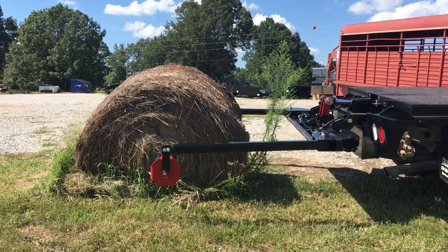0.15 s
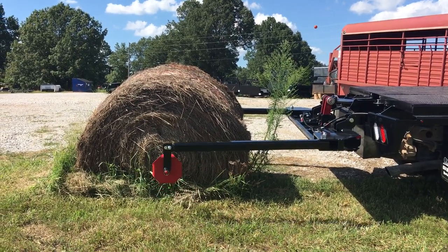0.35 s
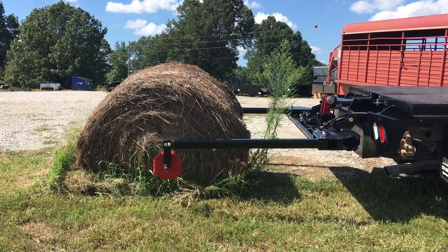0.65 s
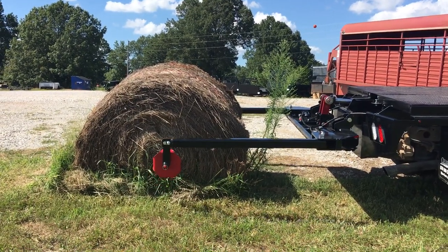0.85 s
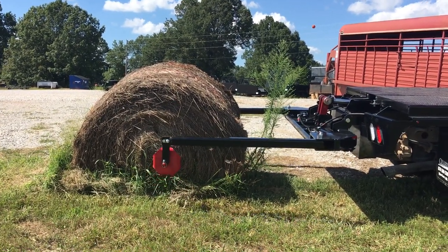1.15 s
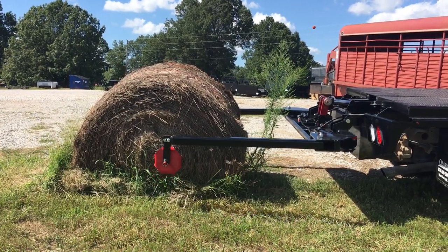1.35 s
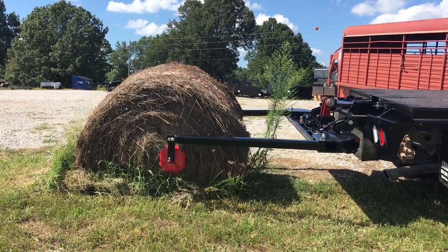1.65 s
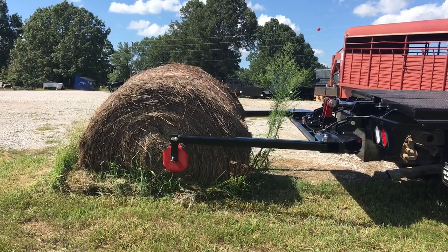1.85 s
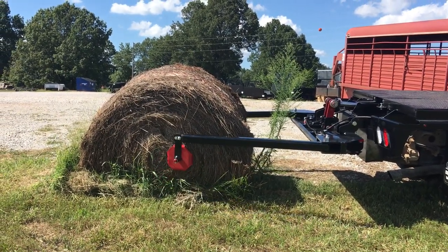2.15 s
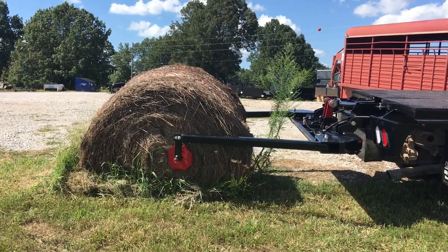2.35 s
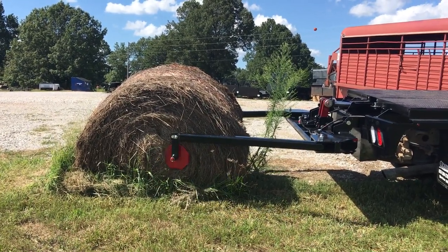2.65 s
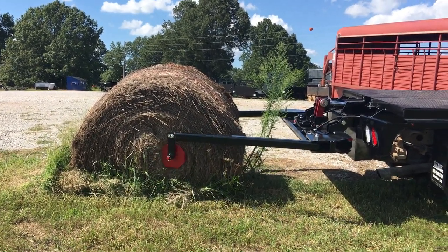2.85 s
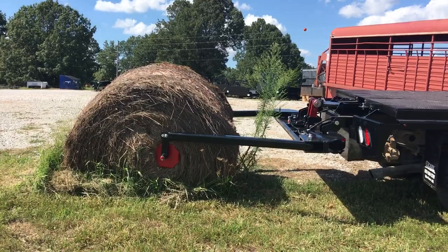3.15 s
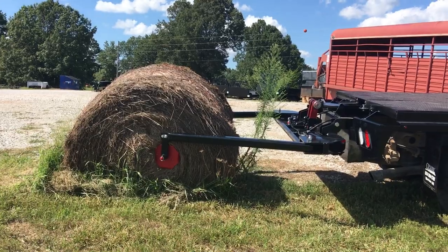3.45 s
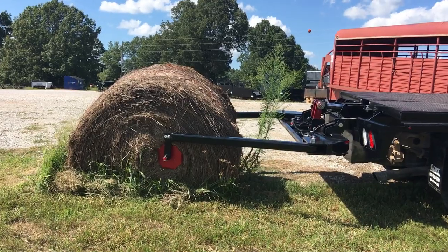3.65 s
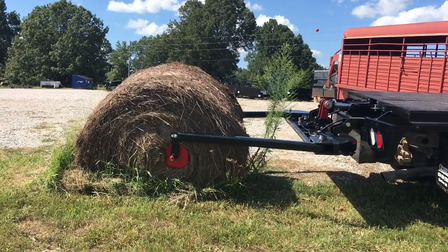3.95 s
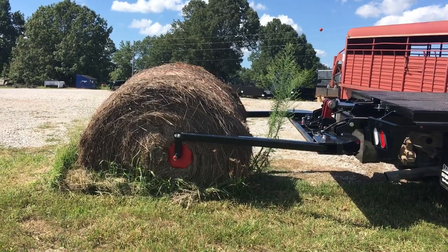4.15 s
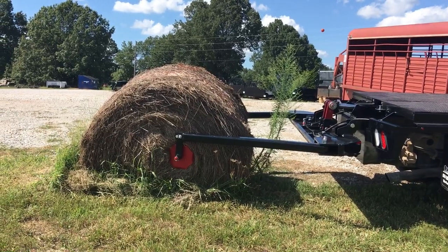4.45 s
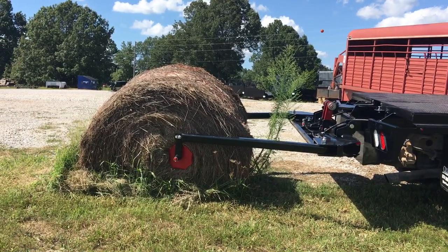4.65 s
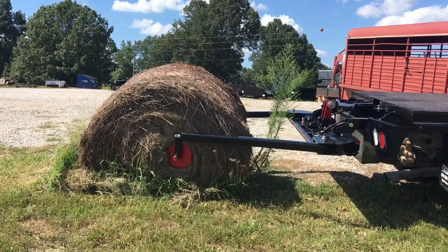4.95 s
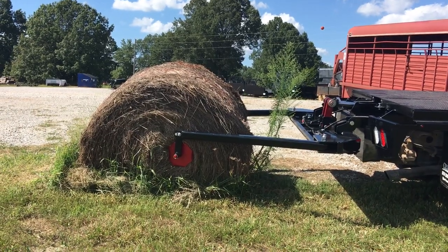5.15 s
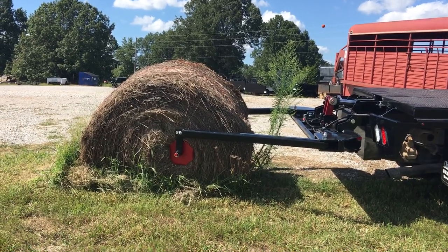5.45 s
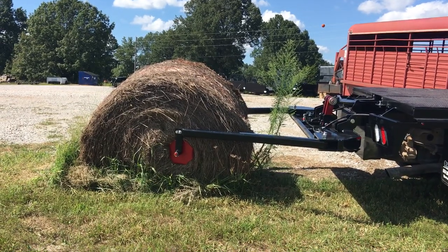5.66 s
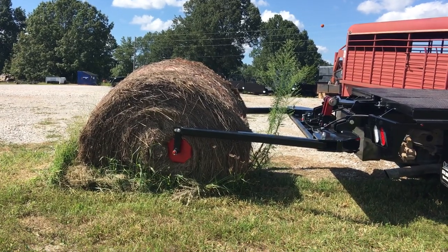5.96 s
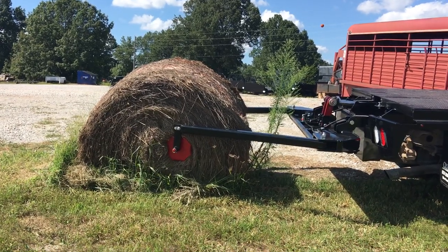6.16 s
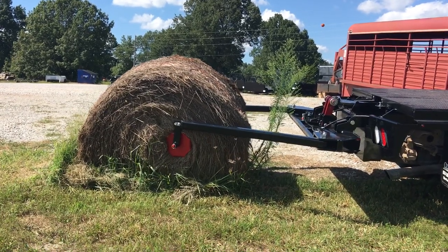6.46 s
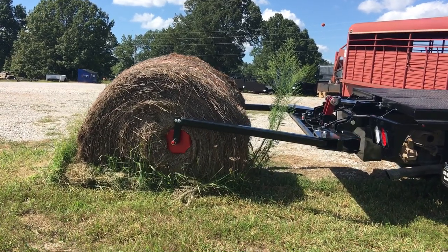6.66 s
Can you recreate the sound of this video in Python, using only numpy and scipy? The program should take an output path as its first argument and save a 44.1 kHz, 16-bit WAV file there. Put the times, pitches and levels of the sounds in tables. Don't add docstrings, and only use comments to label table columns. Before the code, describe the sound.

A hydraulic pump whines over a throbbing truck engine, steel arms clank and squeeze a hay bale, the pump bogs down, stops, then restarts under load.

```python
import sys
import numpy as np
from scipy import signal
from scipy.fft import rfft, irfft, next_fast_len
from scipy.io import wavfile

SR = 44100
rng = np.random.default_rng(int(sys.argv[2]) if len(sys.argv) > 2 else 0)


def transcribe(signal):
    frames = np.atleast_2d(signal).T
    limited = np.clip(frames, -1, 1)
    pcm = np.round(limited * 32767).astype(np.int16)
    wavfile.write(sys.argv[1], SR, pcm)


def volts_from_decibels(level):
    exponent = np.asarray(level, float) / 20
    return 10 ** exponent


N = 300321

# (frequency [Hz], density [dB per Hz])
YARD_RUMBLE = [(15, -57), (25, -24), (54, -8), (73, -3.5), (91, -12.5), (145, -11.5), (195, -13.5),
               (286, -31), (339, -23), (523, -36), (870, -35), (1000, -44.5), (1300, -87), (2200, -120)]
# (frequency [Hz], density [dB per Hz])
FAN_AIR = [(700, -13), (1000, 1.5), (1700, 1), (2100, -3), (2700, -11.5), (3200, -7.5), (3900, -3),
           (5000, -12), (5900, -11.5), (6600, -11), (7500, -15), (10000, -23), (15700, -50)]
YARD_DB, FAN_DB = -34, -53.5
FLOOR_DB = -70.5
# (frequency [Hz], density [dB per Hz])
BED_SHAKE = [(60, -70), (170, -33), (215, 9), (270, 5), (330, 3), (420, -35), (900, -90)]
# (time [s], level [dB])
BED_LEVEL = [(0, -69), (1.8, -60), (2.0, -47), (2.7, -47.5), (3.1, -44), (3.6, -50), (4.4, -52), (4.8, -54),
             (6.3, -63), (6.81, -47)]
# (frequency [Hz], width [Hz], level [dB rms])
PANEL_HUMS = [(122, 3.3, -40), (334.2, 0.9, -53.5)]
# (delay [s], level [dB])
ECHO_PATHS = [(.0041, -10), (.0093, -3), (0.0173, -16), (0.0273, -5), (.039, -7)]

# (time [s], firing rate [firings per s])
IDLE_RATE = [(0, 42.3), (1.8, 41.9), (2.5, 46), (3.3, 39.8), (3.8, 46.6), (5.0, 36.5), (5.6, 43.5),
             (6.2, 41.2), (6.81, 38.4)]
CYLINDER_LEVELS = [1.5, -8.5, -1.5, 0, -3, -6.5, -3.5, -18]
# (frequency [Hz], width [Hz], level [dB])
EXHAUST_PIPES = [(56, 17, -5.5), (130.46, 2.7, -0.5), (134, 3.7, 2), (167.6, 5.9, 0.5), (185.4, 5.1, -5),
                 (243.3, 12.4, -7), (330, 9.4, -14)]
EXHAUST_DB = -35
# (time [s], lead [cycles], crest [dB], depth [dB])
BOOM_SWELLS = [(0, -0.0069, -28.5, 15), (.3, -0.039, -27.5, 7), (.78, -0.073, -27.5, 4),
               (1.2, -0.49, -27, 9.5), (1.55, -0.27, -27.5, 1.5), (1.9, -0.47, -25.5, 8),
               (2.5, -0.53, -25.5, 9.5), (2.85, -0.63, -27.5, 3), (3.25, -0.5, -26, 10.5),
               (3.6, -0.53, -24, 18), (4.0, -0.36, -22.5, 19.5), (4.5, -0.38, -29.5, 16.5),
               (4.85, -0.21, -25.5, 13.5), (5.3, -0.29, -24.5, 9.5), (5.7, -0.21, -27, 10),
               (6.3, -0.36, -31.5, 4.5), (6.81, -0.37, -34.5, -3.5)]
# (time [s], level [dB])
ODD_CYCLE_HITS = [
    (3.03, 7),
    (3.428, -1.5),
    (3.61, 3.5),
    (3.79, -4),
    (4.14, -2.5),
    (4.32, 0.5),
    (4.49, 9.5),
    (5.58, -6),
    (6.0, 6.5),
]
CYCLES_PER_S, ODD_CYCLE_S = 5.4, 0.046
THROB_FULLNESS = 0.69

# (time [s], peak [dB], centre frequency [Hz])
STRAW_SNAPS = [(2.3004, -40, 8000), (2.337, -44, 8800), (2.351, -44, 8700), (2.405, -44, 8900),
               (2.4525, -30, 9500), (2.6465, -39, 9200), (2.8685, -39, 7100), (2.4994, -42, 8400),
               (2.5584, -41, 8630), (2.5661, -30, 12000), (2.712, -27, 9600), (2.921, -35, 5720),
               (2.9492, -16.5, 8540), (2.9504, -28, 7000), (2.6304, -40, 9250), (2.9901, -35, 5430),
               (3.0764, -36, 7960), (3.0952, -35, 6640), (3.2324, -51, 6400), (3.328, -52, 11000),
               (3.4176, -54, 11000), (3.535, -39, 7400), (3.5351, -43, 12500), (3.7718, -49, 6500),
               (3.8845, -54, 9900), (3.91, -52, 12000), (4.0754, -57, 6700), (4.2776, -45, 7100),
               (5.0229, -51, 12500), (5.3417, -48, 9000), (5.5976, -47, 8000), (6.287, -50, 6000),
               (6.4544, -37, 11000), (6.5744, -37, 12000)]
# (time [s], level [dB rms], low edge [Hz], high edge [Hz], 60 dB decay [s])
VALVE_RATTLES = [(1.87, -29.5, 440, 6300, 0.11), (3.078, -38.5, 510, 2200, 0.22),
                 (3.084, -39, 6100, 11000, 0.082), (3.142, -45.5, 3100, 4000, 0.15),
                 (3.1397, -44.5, 3300, 10000, 0.094), (5.11, -61, 7900, 8400, .12),
                 (5.231, -54.5, 2200, 5600, 0.49), (5.23, -65, 7100, 7370, .5),
                 (5.235, -67, 8210, 8600, .5), (5.611, -40, 3000, 4700, 0.15),
                 (5.611, -37.5, 5300, 14000, 0.1), (5.622, -40, 930, 1640, 0.15),
                 (5.648, -33, 575, 820, 0.45), (5.652, -36, 520, 1020, 0.095), (2.3, -54, 4100, 6500, 3),
                 (2.6, -56, 4000, 6700, 3), (5.675, -40, 1760, 1900, 0.22), (2.97, -33, 1360, 1800, 0.072),
                 (6.645, -40, 5200, 6800, 0.058)]
# (time [s], level [dB], hardness [dB per octave])
ARM_BLOWS = [(1.809, -19.5, 1.5), (1.812, -21.5, 3), (1.817, -19.5, 0), (1.822, -22.5, 1.5),
             (1.827, -18.5, 0), (1.843, -20.5, -5), (1.86, -21.5, -5), (1.877, -21, -8), (1.925, -26, -5),
             (1.935, -26, -2.5), (1.948, -30, -2), (2.024, -28, -11)]
# (frequency [Hz], level [dB], 60 dB decay [s])
ARM_MODES = [(184, -1.5, 0.18), (278, -10, 0.21), (541, -5, 0.051), (618, 0, 0.12), (753, -3.5, 0.041),
             (1000, 0.5, 0.015), (1180, -4.5, 0.055), (1450, -7, 0.064), (1620, -0.5, 0.046),
             (1850, -11, 0.066), (2066, -8, 0.12), (2510, -3, 0.022), (3100, -15, 0.028),
             (3540, -10.5, 0.056), (4580, -10, 0.016), (5140, -19, .03), (7100, -26, .03)]

# (time [s], whine [dB], oil flow [dB])
CLAMP_EFFORT = [(0, -42.5, -49), (.6, -43, -48), (1.82, -43, -48.5), (1.88, -47, -38.5), (2.1, -52, -40),
                (2.35, -48, -39.5), (2.6, -44.5, -39), (2.82, -39.5, -45), (2.92, -44, -50),
                (3.0, -44, -53), (3.14, -50, -57)]
# (time [s], whine [dB], oil flow [dB])
LIFT_EFFORT = [
    (5.63, -44, -49),
    (5.74, -43.5, -36.5),
    (5.85, -44, -43),
    (6.0, -43, -39.5),
    (6.3, -42.5, -41.5),
    (6.45, -43, -41.5),
    (6.6, -42, -42.5),
    (6.81, -38, -43),
]
FREE_HZ, TEETH = 564, 9
COLD_DROP_HZ = 1.1
GRIP_S, GRIP_SPAN_S, GRIP_DROP_HZ = 1.9809, .1029, 26.4
PACK_S, PACK_SPAN_S, PACK_DROP_HZ = 2.74, .06, 5.3
STALL_S, STALL_SPAN_S, STALL_DROP_HZ = 2.6448, .2596, 338.2
START_S, SPIN_UP_S, START_TOP_HZ = 5.6084, .0652, 529.7
WEIGHT_S, WEIGHT_SPAN_S, WEIGHT_DROP_HZ = 6.0593, .4953, 182.2

# (harmonic [multiple], level [dB])
FREE_LINES = [(1, 2.5), (2, 0), (3, -5), (4, -1.5), (5, -24.5), (6, -7.5), (7, -8.5), (8, -14), (9, -19.5),
              (10, -25), (11, -30), (12, -13.5), (13, -13.5), (14, -4), (15, -10), (16, -15), (17, -20),
              (18, -23), (19, -32), (20, -30), (21, -33), (22, -26), (23, -27), (24, -24), (25, -34),
              (26, -39), (27, -36)]
# (harmonic [multiple], level [dB])
LOADED_LINES = [(1, 10), (2, -8), (3, -5.5), (4, -5.5), (5, -4.5), (6, 1.7), (7, -3.5), (8, -2), (9, 4),
                (10, 1.5), (12, 3), (14, -3), (17, -2.2), (20, 3), (28, -4), (40, -8.1)]
# (harmonic [shaft multiple], level [dB])
MOTOR_LINES = [(34, -12.5), (56, -16), (113, -18), (128, -19.5)]
# (frequency [Hz], width [Hz], level [dB])
HOUSING_MODES = [(350, 170, -6.5), (456.5, 13, -0.5), (650, 134, 8), (889, 104, 5.5), (1140, 167, 9.5),
                 (1410, 305, 5), (1630, 60, -2), (1870, 120, -7), (2060, 237, 5.5), (2223, 31, 2),
                 (2440, 330, -6), (3320, 113, -3.5), (3531, 19, 9), (3686, 194, 4), (4010, 190, -11.5),
                 (4560, 230, -8.5), (5186, 250, -7.5), (5426, 26, 1.5), (5880, 220, -6.5), (6700, 56, -8),
                 (7110, 120, 0.5), (7650, 100, -18), (8000, 320, -9.5), (8300, 52, -12), (8800, 630, -5.5),
                 (9500, 540, -23), (11000, 380, -27), (11500, 107, -15), (12171, 356, -20),
                 (12855, 221, -21), (13600, 271, -30)]
# (harmonic [multiple], level [dB])
UNSETTLED_LINES = [(1, 2), (2, -3), (3, -11), (4, -1), (6, 0.5), (7, -9), (8, 1.5)]
SETTLE_S, SETTLE_SPAN_S = .28, .03
# (harmonic [multiple], frequency [Hz],
# width [Hz], level [dB])
HOSE_FLARES = [(1, 336, 60, -15.5), (1, 358, 5.2, 12), (1, 375, 5.6, -17), (1, 462, 77, -5),
               (1, 530, 12.6, -18), (1, 543, 5.6, 8), (2, 806, 29, 9.5), (2, 853, 43, 6),
               (2, 680, 33, -6.5), (2, 1085, 8.4, 10), (3, 693, 130, 29), (3, 1073, 6.1, -13),
               (3, 1118, 7, -20), (4, 1330, 140, -11), (4, 1488, 16, -7), (4, 1584, 103, -18),
               (3, 1635, 57, 16), (3, 950, 200, 5), (5, 2750, 260, -9), (6, 2880, 170, -5.5),
               (7, 3280, 440, -4.5), (5, 2280, 40, -1), (1, 460, 59, -1.5), (2, 610, 140, -15),
               (9, 5000, 130, -12), (10, 5450, 130, -2.5), (8, 3300, 190, -3), (9, 4100, 150, -9),
               (21, 8200, 440, 5), (22, 8200, 500, 9), (11, 4400, 150, 13), (4, 1640, 460, 20),
               (4, 1753, 43, 6.5), (4, 1763, 150, -7), (4, 2010, 73, -4.5), (4, 2145, 7.8, -20),
               (4, 2238, 43, 9.5), (6, 1500, 232, 6), (6, 1962, 340, 16.5), (6, 2161, 20, -27),
               (6, 2270, 82, -1), (7, 3714, 21, 6), (7, 3810, 43, 15), (11, 4512, 150, 7),
               (13, 7099, 240, 5.5), (13, 7295, 23, 16), (14, 7624, 202, 14), (18, 8340, 300, 2),
               (19, 8700, 380, 4.5), (23, 12850, 150, 2), (16, 8900, 150, -3)]
# (harmonic [multiple], frequency [Hz], width [Hz], level [dB])
LIFT_HOSE_FLARES = [(3, 1240, 130, 2), (8, 3080, 140, 3), (11, 5100, 90, 8), (11, 4160, 120, 11),
                    (10, 4560, 80, -3), (12, 5400, 300, -1), (16, 7100, 300, -8), (18, 8300, 900, 3),
                    (20, 8300, 470, 8), (21, 8800, 300, -12), (22, 8300, 200, 0), (6, 2230, 130, -2.5),
                    (4, 1750, 180, 0.5), (14, 6300, 300, -3), (17, 7500, 300, 5), (2, 920, 60, 0.5),
                    (1, 426, 36, -5), (2, 890, 53, -5), (4, 1860, 56, 3.5), (9, 3700, 100, 0),
                    (12, 5560, 60, 0), (13, 5900, 300, 1), (5, 2300, 80, -6), (7, 2600, 200, -3),
                    (10, 4360, 300, 2), (6, 1980, 130, 7.5), (11, 4740, 200, -4)]
# (harmonic [multiple], start [s], level [dB])
SQUEEZED_LINES = [(1, 2.49, -12), (4, 2.76, -2.5), (3, 2.76, 1), (8, 2.6, 1), (8, 3.4, 1), (9, 2.85, 0),
                  (12, 2.75, 1), (11, 2.5, -2.5), (19, 2.4, -2), (20, 2.55, 0), (21, 2.55, -10),
                  (10, 2.35, 4), (12, 2.2, -4), (16, 1.9, -2), (14, 2.43, 2.5), (13, 2.25, -3),
                  (10, 1.9, -3), (11, 1.8, -6), (11, 2.3, 7), (4, 1.98, 2), (6, 2.2, -4), (6, 2.7, 4),
                  (6, 2.87, -3.5), (7, 2.8, -1), (10, 2.75, -6), (13, 2.45, 4), (15, 2.37, 3)]
BITE_S, UNBITTEN_DB = 5.75, -7
THIRD_FADE_S, THIRD_FADE_DB = 1.15, -5
HARMONICS, TOP_HZ = 40, 15700
FREE_BRIGHT_DB, LOADED_BRIGHT_DB = 1.07, 1.93
DULLING_DB, DULLEST_DB = 8.5, -3.5
WANDER_DB = 1.3
FLUTTER_DB, FLUTTER_PER_S = 2.6, 13
LOADED_JITTER, STALL_JITTER, JITTER_FROM_S = .022, .09, 2.68
SIDE_GROWTH_DB, SIDE_GROWTH_FROM = 9, 17
ROUGH_FROM_S, STALL_FLUTTER_DB = 2.95, 3.5

# (frequency [Hz], density [dB per Hz])
OIL_HISS = [(400, -30), (777, -39), (1160, 1.5), (1680, -7.5), (1960, -4.5), (2200, 3.5), (2750, -19.5),
            (3580, -2.5), (4800, -7.5), (6300, -11), (7100, -6.5), (8400, -2.5), (9400, -7.5), (10300, -33)]
LOADED_HISS_DB = -6
# (frequency [Hz], density [dB per Hz])
BRUSH_SIZZLE = [(8000, -11), (9800, -7.5), (10400, -8.5), (11600, -6), (12200, -11), (13000, -8),
                (13600, -13), (14500, -13), (15700, -13), (15900, -48)]
SIZZLE_DB, SIZZLE_LIFT_DB, SIZZLE_FOLLOWS = -58, -64.5, 0.6
# (frequency [Hz], density [dB per Hz])
FRAME_GROAN = [(350, -42), (480, -12), (590, 3.5), (680, -4), (780, -4), (944, 3.5), (1130, -4),
               (1400, -11), (1700, -12), (2200, -13), (2800, -33.5), (7000, -40)]
GROAN_DB = -58.5
# (time [s], level [dB], rise [s], fall [s])
FRAME_SHUDDERS = [
    (1.95, -48, 0.15, 0.13),
    (2.4, -60, 0.27, 0.17),
    (2.98, -44, 0.2, 0.062),
    (3.09, -44.5, 0.081, 0.11),
    (5.66, -44, 0.012, 0.11),
    (6.5, -55.5, 0.071, 0.36),
]
GRIND_BAND = [614, 1100]
GRIND_S, GRIND_DB, GRIND_RISE_S, GRIND_FALL_S = 3.08, -48, 0.17, 0.065


def rms_one(x):
    return x / np.sqrt(np.mean(x ** 2) + 1e-20)


def in_time(rows):
    s, *columns = np.transpose(rows)
    return [np.interp(np.arange(N) / SR, s, c) for c in columns]


def smooth_step(t, at, span):
    return .5 + .5 * np.tanh((t - at) / span)


def swell(t, at, rise, fall):
    return np.exp(-((t - at) / np.where(t < at, rise, fall)) ** 2)


def drift(rate, count=1):
    knots = rng.standard_normal((count, int(N / SR * 60) + 62))
    r = np.exp(-2 * np.pi * rate / 60)
    slow = signal.lfilter([1], [1, -r], knots)[:, 60:]
    at = np.arange(N) / SR * 60
    return np.array([np.interp(at, np.arange(len(k)), rms_one(k)) for k in slow])


def shaped(x, gain):
    size = next_fast_len(N + SR // 2)
    hz = np.arange(size // 2 + 1) * SR / size + 1e-3
    return irfft(rfft(x, size) * gain(hz), size)[:N]


def coloured(points):
    hz, db = np.transpose(points)
    return rms_one(shaped(rng.standard_normal(N), lambda f: volts_from_decibels(np.interp(np.log(f), np.log(hz), db))))


def echoes(hz):
    return 1 + sum(volts_from_decibels(db) * np.exp(-2j * np.pi * hz * late) for late, db in ECHO_PATHS)


def yard():
    rumble = volts_from_decibels(YARD_DB + .5 * drift(24.0)[0]) * coloured(YARD_RUMBLE)
    return rumble + volts_from_decibels(FAN_DB + .5 * drift(5.9)[0]) * coloured(FAN_AIR)


def bed_panels():
    return volts_from_decibels(in_time(BED_LEVEL)[0] + 4.2 * drift(10.0)[0]) * coloured(BED_SHAKE)


def panel_hums():
    t, out = np.arange(N) / SR, np.zeros(N)
    for hz, width, db in PANEL_HUMS:
        level = volts_from_decibels(db) * np.sqrt(2) * volts_from_decibels(0.83 * drift(width)[0])
        out += level * np.sin(2 * np.pi * hz * t + 1.05 * drift(width)[0])
    return out


def exhaust_response(hz):
    gain = volts_from_decibels(-46.0)
    for k, (centre, width, db) in enumerate(EXHAUST_PIPES):
        off_tune = (hz / centre - centre / hz) * centre / width
        gain = gain + volts_from_decibels(db) / (1 + 1j * off_tune) * 1j ** (k % 2)
    return gain / (1 + (hz / 450) ** 4)


def throb_db():
    t, (lead, crest_db, depth_db) = np.arange(N) / SR, in_time(BOOM_SWELLS)
    dip = np.sin(np.pi * (CYCLES_PER_S * t + lead)) ** 2
    odd_db = sum(db * swell(t, s, ODD_CYCLE_S, ODD_CYCLE_S) for s, db in ODD_CYCLE_HITS)
    return crest_db - depth_db * dip ** THROB_FULLNESS + odd_db + 1.7 * drift(3.9)[0]


def engine():
    fired = np.cumsum(in_time(IDLE_RATE)[0]) / SR
    at = np.flatnonzero(np.diff(np.floor(fired)))
    pulses = np.zeros(N)
    pulses[at] = volts_from_decibels(np.resize(CYLINDER_LEVELS, len(at)) + 3.7 * rng.standard_normal(len(at)))
    pipes = rms_one(shaped(pulses, exhaust_response))
    boom = np.sqrt(2) * np.sin(4 * np.pi * fired + 0.84 * drift(1.17)[0])
    return volts_from_decibels(EXHAUST_DB - 6.0) * pipes + volts_from_decibels(throb_db()) * boom


def straw():
    out, t = np.zeros(N), np.arange(300) / SR
    for s, db, hz in STRAW_SNAPS:
        snap = np.sin(2 * np.pi * hz * t) * np.exp(-t * hz / 0.52)
        crackle = 0.07 * rng.standard_normal(len(t)) * np.exp(-t / 0.0007)
        out[round(s * SR):][:len(t)] += volts_from_decibels(db + 13.0) * (snap + crackle)
    return signal.sosfilt(signal.butter(2, 4300.0, "high", fs=SR, output="sos"), out)


def rattles():
    out, t = np.zeros(N), np.arange(SR // 3) / SR
    for s, db, low_hz, high_hz, t60 in VALVE_RATTLES:
        band = signal.butter(3, [low_hz, high_hz], "band", fs=SR, output="sos")
        contacts = rms_one(signal.sosfilt(band, rng.standard_normal(len(t))))
        burst = contacts * volts_from_decibels(db - 60 * t / t60) * np.minimum(t / 0.0014, 1)
        start = round(s * SR)
        out[start:][:len(t)] += burst[:N - start]
    return out


def clank():
    (s, db, hardness_db), out = np.transpose(ARM_BLOWS), np.zeros(N)
    for hz, level_db, t60 in ARM_MODES:
        luck = rng.standard_normal(len(s))
        blow_db = db + level_db - 7.0 + hardness_db * np.log2(max(hz / 600, 1)) + 2.5 * luck
        blows = np.full(N, 1e-18)
        blows[(s * SR).astype(int)] = volts_from_decibels(blow_db) * np.sign(luck)
        r, w = volts_from_decibels(-60 / (t60 * SR)), 2 * np.pi * hz / SR
        out += signal.lfilter([0, np.sin(w)], [1, -2 * r * np.cos(w), r * r], blows)
    return signal.sosfilt(signal.butter(4, 6500, fs=SR, output="sos"), out)


def housing(hz):
    peaks = sum(volts_from_decibels(db) / (1 + ((hz / centre - centre / hz) * centre / width) ** 2)
                for centre, width, db in HOUSING_MODES)
    return volts_from_decibels(-58.0) + peaks


def pump_speed(t):
    clamp = FREE_HZ + .2 - COLD_DROP_HZ * (1 - smooth_step(t, SETTLE_S, 3 * SETTLE_SPAN_S))
    clamp = clamp - GRIP_DROP_HZ * smooth_step(t, GRIP_S, GRIP_SPAN_S)
    clamp = clamp - PACK_DROP_HZ * smooth_step(t, PACK_S, PACK_SPAN_S)
    clamp = clamp - STALL_DROP_HZ * np.exp(-np.exp((STALL_S - t) / STALL_SPAN_S))
    lift = START_TOP_HZ * (1 - np.exp(np.minimum(START_S - t, 0) / SPIN_UP_S))
    lift = lift - WEIGHT_DROP_HZ * smooth_step(t, WEIGHT_S, WEIGHT_SPAN_S)
    return np.where(t < START_S, clamp, np.maximum(lift, 100))


def line_gain(k, t, mesh_hz, load, loaded_db):
    lifting = t > START_S
    free_db = np.interp(k, *np.transpose(FREE_LINES), right=-60)
    free_db = free_db - 20 * np.log10(abs(housing(k * FREE_HZ)))
    db = (1 - load) * (free_db - loaded_db)
    unsettled_db = np.interp(k, *np.transpose(UNSETTLED_LINES), right=0)
    db = db + unsettled_db * (1 - smooth_step(t, SETTLE_S, SETTLE_SPAN_S))
    for flares, present in ((HOSE_FLARES, load), (LIFT_HOSE_FLARES, lifting)):
        for multiple, centre_hz, width, flare_db in flares:
            if multiple == k:
                db = db + present * flare_db / (1 + (2 * (k * mesh_hz - centre_hz) / width) ** 2)
    for multiple, s, squeeze_db in SQUEEZED_LINES:
        if multiple == k:
            db = db + squeeze_db * smooth_step(t, s, 0.05) * (t < START_S)
    if k > 4:
        db = db + UNBITTEN_DB * lifting * (1 - smooth_step(t, BITE_S, .03))
    if k == 3:
        db = db + (1.5 - load) * THIRD_FADE_DB * smooth_step(t, THIRD_FADE_S, 0.47)
    return volts_from_decibels(db)


def gear_tone(t, mesh_hz, load, shaft):
    slowed_db = LOADED_BRIGHT_DB + DULLING_DB * np.log2(mesh_hz / FREE_HZ)
    bright_db = (1 - load) * FREE_BRIGHT_DB + load * np.maximum(slowed_db, DULLEST_DB)
    turns = np.array([f(j * shaft) for j in (1, 2, 3, 4) for f in (np.sin, np.cos)])
    side_db = [-19.0, -22.5, -27.0, -41.0]
    uneven = rng.standard_normal((HARMONICS, 2, len(turns))) * volts_from_decibels(np.repeat(side_db, 2))
    wander = drift(2.5, count=HARMONICS)
    flutter = load * FLUTTER_DB * (drift(FLUTTER_PER_S, count=7) - .15)
    stalling = smooth_step(t, JITTER_FROM_S, .08) * (t < START_S)
    jitter = (LOADED_JITTER + STALL_JITTER * stalling) * flutter[-1]
    tone = np.zeros(N)
    for k, (loud, late), slow in zip(np.arange(HARMONICS) + 1, uneven, wander):
        loaded_db = np.interp(k, *np.transpose(LOADED_LINES))
        main = line_gain(k, t, mesh_hz, load, loaded_db)
        phase = k * (TEETH * shaft + jitter) + k * k
        side = min(k / 3, 1) * (1 - .25 * load)
        side = side * volts_from_decibels((1 - load) * SIDE_GROWTH_DB * (k >= SIDE_GROWTH_FROM))
        lines = (main + side * (loud @ turns)) * np.sin(phase) + side * (late @ turns) * np.cos(phase)
        level_db = loaded_db + bright_db * np.log2(k) + WANDER_DB * (0.57 + k / 14) * slow
        level_db = level_db + flutter[k % 7] * min(k / 8 + 0.86, 1)
        tone += volts_from_decibels(level_db) * (k * mesh_hz < TOP_HZ) * lines
    return tone


def motor_tone(load, shaft):
    return sum((1 - load) * volts_from_decibels(db) / abs(housing(k * FREE_HZ / TEETH)) * np.sin(k * shaft)
               for k, db in MOTOR_LINES)


def pump():
    t, (whine_db, flow_db) = np.arange(N) / SR, in_time(CLAMP_EFFORT + LIFT_EFFORT)
    running, load = in_time([(0, 1, 0), (1.82, 1, 0), (1.88, 1, 1), (3.1, 1, 1), (3.15, 0, 1),
                             (5.615, 0, 1), (5.64, 1, 1)])
    mesh_hz = pump_speed(t)
    shaft = 2 * np.pi * np.cumsum(mesh_hz * (1 + 0.0003 * drift(5.0)[0])) / SR / TEETH
    tone = gear_tone(t, mesh_hz, load, shaft) + motor_tone(load, shaft)
    whine = shaped(volts_from_decibels(whine_db) * running * tone, housing)
    shudder = drift(30.0)[0]
    rough = smooth_step(t, ROUGH_FROM_S, .12) * (t < START_S)
    whine = whine * volts_from_decibels(STALL_FLUTTER_DB * rough * (shudder - .5))

    hiss = coloured(OIL_HISS) * (1 + 0.14 * np.sin(TEETH * shaft)) * volts_from_decibels(1.8 * drift(34.0)[0])
    hiss = volts_from_decibels(flow_db + LOADED_HISS_DB * load) * rms_one(shaped(hiss, echoes))
    sizzle_db = np.where(t < START_S, SIZZLE_DB, SIZZLE_LIFT_DB) + SIZZLE_FOLLOWS * (flow_db - flow_db[0])
    sizzle = volts_from_decibels(sizzle_db + 2.0 * drift(25.0)[0]) * coloured(BRUSH_SIZZLE)

    groan = coloured(FRAME_GROAN) * volts_from_decibels(1.1 * shudder)
    strain = sum(volts_from_decibels(db) * swell(t, s, rise, fall) for s, db, rise, fall in FRAME_SHUDDERS)
    grind = rms_one(signal.sosfilt(signal.butter(2, GRIND_BAND, "band", fs=SR, output="sos"), groan))
    grind = volts_from_decibels(GRIND_DB) * swell(t, GRIND_S, GRIND_RISE_S, GRIND_FALL_S) * grind
    return whine + grind + running * (hiss + volts_from_decibels(GROAN_DB) * groan + sizzle) + strain * groan


def scene():
    background = yard() + bed_panels() + panel_hums() + engine()
    return (background + straw() + rattles() + clank() + pump())[None]


def roll_off(x):
    return signal.sosfilt(signal.butter(12, 16810, fs=SR, output="sos"), x)


def record(dry):
    noise_edge = signal.cheby2(12, 50, 16100, fs=SR, output="sos")
    floor = signal.sosfilt(noise_edge, rng.standard_normal(N))
    band_edge = signal.cheby2(16, 36, 15950, fs=SR, output="sos")
    rounded = .3 * np.tanh(dry / .3)
    mix = signal.sosfilt(band_edge, rounded + volts_from_decibels(FLOOR_DB) * floor)
    return roll_off(mix)


dry = scene()
out = record(dry)
transcribe(out)
```